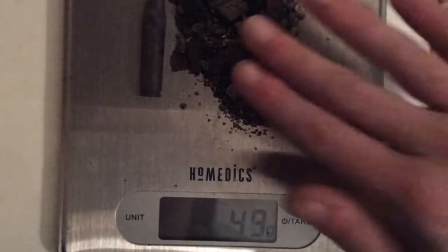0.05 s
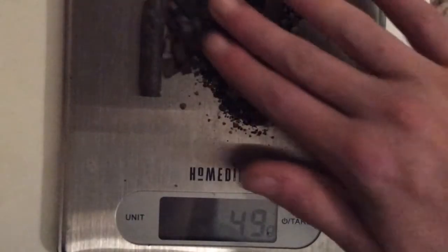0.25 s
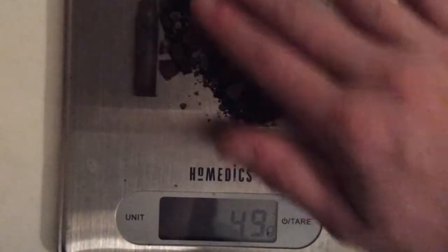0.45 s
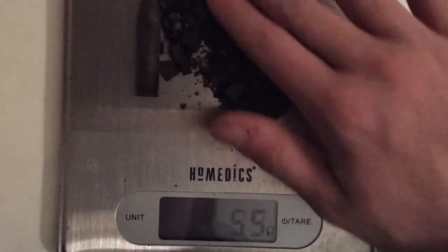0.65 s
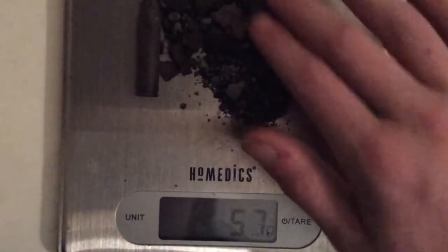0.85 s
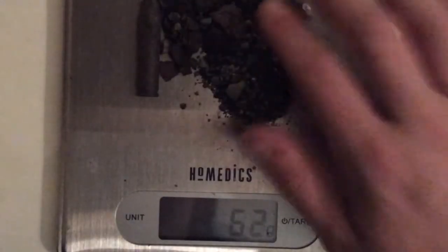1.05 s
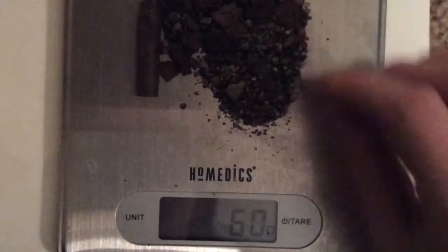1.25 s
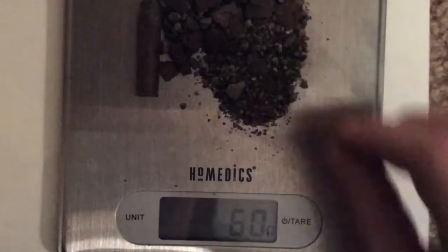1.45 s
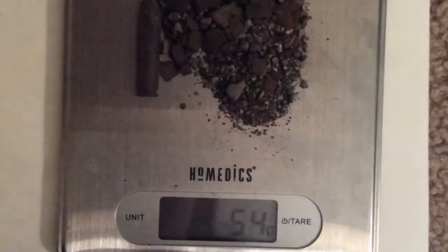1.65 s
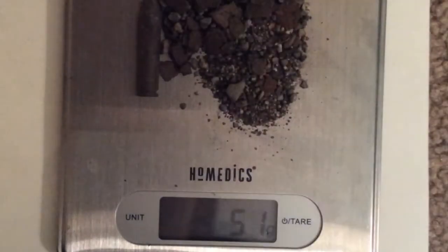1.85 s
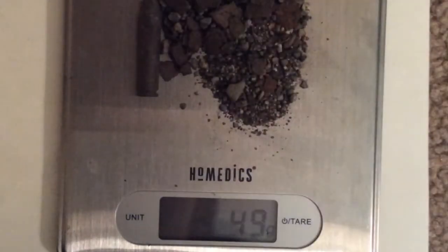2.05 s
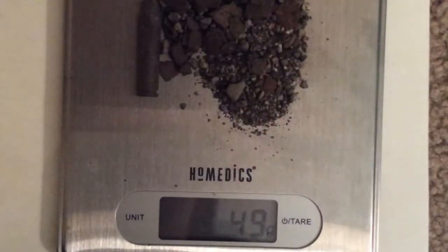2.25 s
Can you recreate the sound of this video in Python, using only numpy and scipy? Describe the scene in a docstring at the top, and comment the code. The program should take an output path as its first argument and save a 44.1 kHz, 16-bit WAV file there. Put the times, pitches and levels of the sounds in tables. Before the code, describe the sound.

Close up in a quiet room, a hand pushes coarse grit over a metal scale pan: two firm, crunchy scrapes, then a lighter skim. Loose chips tick against the steel, and then only faint room hiss remains.

```python
"""A quiet room, one microphone close to a kitchen scale. Fingers sweep a heap of grit three times across
its steel pan: two strokes press down, the third only skims. Coarse chips knock while fine grit crackles
over them; single chips snap free during the strokes and tumble back after them. The pan rings briefly
under its load, and the hand bumps softly against the scale. Behind it all lie low rumble and hiss."""
import sys
import numpy as np
from scipy import signal
from scipy.fft import rfft, irfft
from scipy.io import wavfile

SR = 44100
rng = np.random.default_rng(int(sys.argv[2]) if len(sys.argv) > 2 else 0)


def to_wav(sig):
    """Store sig (one row per channel, or 1-D mono) as 16-bit WAV at the path in sys.argv[1].

    Samples outside -1..1 are clipped; the rate is SR.
    """
    pcm = np.clip(np.atleast_2d(sig), -1, 1) * 32767
    pcm = np.round(pcm).astype(np.int16)
    wavfile.write(sys.argv[1], SR, pcm.T)  # frames by channels


N = 105840

# The swell of the three strokes, one list each.
# Each row: time in seconds, relative level of the coarse chips in dB, that of the fine grit in dB.
STROKE_SWELLS = [
    [(.218, -68, -86), (.222, -47, -64), (.231, -43, -47.5), (.252, -38, -48.5), (.298, -31.5, -34.5),
     (.33, -32, -33.5), (.37, -32.5, -36), (.39, -35.5, -40.5), (.416, -53.5, -56), (.424, -55, -67),
     (.436, -51, -60), (.466, -82, -77)],
    [(.617, -63, -72), (.621, -37, -50), (.634, -37.5, -38), (.666, -41, -46), (.694, -32.5, -37),
     (.722, -32.5, -41), (.738, -35.5, -38.5), (.749, -33, -42), (.762, -47.5, -54.5), (.784, -53, -61),
     (.81, -84, -70)],
    [(.941, -80, -74), (.944, -50, -53), (.965, -48, -53.5), (.991, -48.5, -52), (1.02, -44.5, -44.5),
     (1.038, -50, -52), (1.067, -64, -73), (1.08, -75, -76)],
]
# The colour of each stroke at the microphone. Each row: frequency in Hz, gain in dB.
FIRST_PRESS_EQ = [(88, -62), (150, -40), (204, -29), (416, -19.5), (459, -11), (545, -13.5), (900, -7),
                  (1200, 3), (1510, -10), (1950, -0.5), (2270, -8.5), (3090, -12), (3670, -20), (5300, -14),
                  (7940, -21), (10400, -19), (15000, -36.5)]
SECOND_PRESS_EQ = [(150, -40), (337, -21), (468, -11.5), (600, -13.5), (800, -9), (1130, 1), (1510, -12.5),
                   (1900, -6), (2810, -14.5), (3090, -10), (3670, -22), (5000, -14.5), (6060, -13.5),
                   (7210, -19.5), (9630, -19), (15000, -37.5)]
SKIM_EQ = [(150, -22), (280, -29), (430, -4), (510, -17), (610, 3.5), (800, -12.5), (1160, -4),
           (1650, -7.5), (2100, 4), (3100, -9.5), (3600, -17.5), (4460, -8), (6500, -9.5), (8750, -14.5),
           (10200, -12), (15000, -27)]
# Single chips that snap or tumble; smaller ones click higher. Each row: start in seconds, relative
# knock level in dB, relative click level in dB, lower edge of the click in Hz, decay time in seconds.
CHIP_HITS = [(0.2276, -55, -47, 4500, .002), (.2605, -30, -45, 3600, 0.0014),
             (0.2996, -27.5, -44, 3600, 0.0029), (.305, -30, -33.5, 7000, 0.0022),
             (0.3123, -28.5, -34, 3600, 0.0019), (0.3267, -27.5, -32.5, 4500, 0.0029),
             (.332, -27.5, -32.5, 3600, 0.0018), (0.3758, -29.5, -38, 3600, .0015),
             (0.426, -42, -45.5, 4000, 0.0027), (0.485, -57, -76, 3600, 0.0048),
             (0.4916, -54.5, -68, 3600, .003), (0.503, -70, -55.5, 4500, .002),
             (.5388, -67, -55.5, 3000, 0.0016), (0.555, -71, -62, 3600, .0015),
             (0.606, -57, -74, 3600, 0.0016), (0.63, -33, -36, 5000, 0.0042),
             (0.6347, -32.5, -44, 5000, 0.0014), (.642, -39, -34.5, 7000, 0.0038),
             (0.65, -32.5, -53, 3600, 0.0022), (0.6949, -27.5, -39, 3600, 0.0019),
             (0.7155, -32, -34, 3600, 0.0059), (.730, -32.5, -44, 3600, 0.0012),
             (0.7474, -28, -51, 3600, 0.0024), (0.7911, -60, -42.5, 5500, 0.0024),
             (0.9525, -43, -50.5, 10000, .003), (0.962, -38.5, -58, 7000, 0.0027),
             (0.9692, -40, -39.5, 4500, 0.0013), (1.009, -35.5, -38, 4000, 0.0013),
             (1.020, -43, -32, 3600, 0.002), (1.025, -39, -35.5, 3600, 0.0022),
             (1.0887, -57.5, -48, 6500, 0.003), (1.117, -48, -47.5, 4000, 0.00095),
             (1.126, -63, -56, 4500, .002)]
# The ring of the steel pan. Each row: frequency in Hz, relative gain in dB, seconds to fall by 60 dB.
STEEL_MODES = [(645, -5, 0.11), (930, -9.5, .07), (1166, -8, 0.061), (1336, -6, 0.064), (1823, -3, 0.064),
               (2012, -1, 0.108), (3020, -4.5, 0.097), (3150, -2, 0.09), (4020, 3, 0.1), (4470, -12, 0.066),
               (5240, -3, 0.047), (5400, -1, 0.056), (6300, 7.5, 0.0473), (7640, -2.5, 0.081),
               (8300, 5, .07)]
# Room tone and hiss. Each row: frequency in Hz, relative level in dB.
ROOM_TONE_EQ = [(15, -36), (25, -21.5), (48, -5), (77, 1), (167, -3), (196, -7.5), (231, -5.5), (354, -9.5),
                (621, -14), (1030, -19), (2780, -23.5), (3730, -21.5), (7280, -23.5), (9270, -19),
                (15000, -33.5)]

COARSE_PER_S, COARSE_SPREAD_DB, COARSE_DECAY_S, COARSE_DB = 2000, 4, 0.00095, -3
FINE_PER_S, FINE_SPREAD_DB, FINE_DECAY_S, FINE_DB = 3600, 3, 0.00074, -2
SPLIT_HZ = 3400  # coarse chips sound below this, fine grit above
PAN_DB = -4.5
SETTLE_PER_S, SETTLE_DB = 12, -82
ROOM_T60_S, ROOM_DB, ROOM_DULL_HZ = 0.16, -22.5, 3500
ROOM_TONE_DB, RUMBLE_WAVER_DB = -66.5, 1.5
TOP_HZ = 15300

# The hand bumping and rubbing against the scale.
# Each row: start in seconds, level in dB, band centre in Hz, decay time in seconds.
HAND_CONTACTS = [(.05, -61.5, 89, 0.018), (.425, -56, 583, 0.011), (0.479, -63.5, 500, 0.01),
                 (.53, -61.5, 75, 0.017), (1.749, -66, 229, 0.017), (1.835, -74, 1710, 0.02)]


def stroke(swell, colour):
    """One sweep of the fingers, close up: coarse chips rattle, fine grit crackles."""
    times, coarse_db, fine_db = np.array(swell).T
    t = np.arange(N) / SR
    envelope = lambda db: undb(np.interp(t, times, db, left=-np.inf, right=-np.inf))
    coarse = grains(COARSE_PER_S, COARSE_SPREAD_DB, COARSE_DECAY_S)
    coarse = unit(cut(tint(coarse, colour), SPLIT_HZ, "low"))
    fine = grains(FINE_PER_S, FINE_SPREAD_DB, FINE_DECAY_S)
    fine = unit(cut(tint(fine, colour), SPLIT_HZ, "high"))
    return coarse * envelope(coarse_db + COARSE_DB) + fine * envelope(fine_db + FINE_DB)


def grains(per_s, spread_db, decay_s, stones=24):
    """Collisions at random moments and of uneven size, shared among differently ringing stones."""
    collides = rng.random(N) < per_s / SR
    hits = collides * undb(spread_db * np.minimum(rng.standard_normal(N), 2))
    struck = rng.integers(0, stones, N)
    return sum(through(hits * (struck == k), stone_ring(decay_s)) for k in range(stones))


def stone_ring(decay_s, size=2048):
    """The short irregular ring of one stone, with unit energy."""
    ring = rng.standard_normal(size) * np.exp(-np.arange(size) / SR / decay_s)
    return ring / np.linalg.norm(ring)


def chips():
    """Each chip gives a knock and a click, coloured like the stroke that loosened it."""
    second_s, skim_s = STROKE_SWELLS[1][0][0], STROKE_SWELLS[2][0][0]
    out = np.zeros(N)
    for at, knock_db, click_db, click_hz, decay_s in CHIP_HITS:
        colour = FIRST_PRESS_EQ if at < second_s else SECOND_PRESS_EQ if at < skim_s else SKIM_EQ
        ring = tint(stone_ring(decay_s), colour)
        knock = undb(knock_db) * unit(cut(ring, SPLIT_HZ, "low"))
        click = undb(click_db) * unit(cut(ring, click_hz, "high"))
        onset_gain = np.sqrt(decay_s * SR / 2 / len(ring))  # refers the levels to the start of the hit
        start = int(at * SR)
        out[start:start + len(ring)] += (knock + click) * onset_gain
    return out


def pan(grit):
    """The steel pan's damped modes, driven by the grit."""
    t = np.arange(SR // 4) / SR
    response = 0
    for hz, db, t60 in STEEL_MODES:
        damping = np.log(1000) / t60
        mode = np.exp(-damping * t) * np.cos(2 * np.pi * hz * t)
        response += undb(db) * 2 * damping / SR * mode
    return undb(PAN_DB) * through(grit, response)


def hand_bumps():
    """Soft contacts of skin on the scale that swell and die away, each an octave of noise."""
    t = np.arange(N) / SR
    out = np.zeros(N)
    for at, db, hz, decay_s in HAND_CONTACTS:
        age = np.maximum(t - at, 0) / decay_s
        dull_noise = cut(rng.standard_normal(N), hz * np.sqrt(2), "low")
        body = unit(cut(dull_noise, hz / np.sqrt(2), "high"))
        out += undb(db) * body * age * np.exp(1 - age)
    return out


def settling():
    """Faint ticks of stray grains creeping in the heap."""
    ticks = grains(SETTLE_PER_S, spread_db=4, decay_s=FINE_DECAY_S, stones=4)
    return undb(SETTLE_DB) * unit(cut(tint(ticks, FIRST_PRESS_EQ), 3500, "high"))


def room_tail(near):
    """The furnished room returns a short, dull tail, reaching the microphone 6 ms late."""
    t = np.arange(SR // 2) / SR
    reflections = cut(rng.standard_normal(len(t)), ROOM_DULL_HZ, "low", order=1)
    tail = reflections * undb(-60 * t / ROOM_T60_S) * (t > .006)
    return undb(ROOM_DB) * through(near, tail / np.linalg.norm(tail))


def room_tone():
    """Low room rumble that wavers a little, under even hiss."""
    noise = undb(ROOM_TONE_DB) * unit(tint(rng.standard_normal(N), ROOM_TONE_EQ))
    rumble = cut(noise, 400, "low", order=1)
    drift = unit(cut(rng.standard_normal(N), 13.5, "low", order=2))
    return noise + (undb(RUMBLE_WAVER_DB * drift) - 1) * rumble


def undb(db):
    """Decibels to amplitude."""
    return 10 ** (np.asarray(db) / 20)


def unit(x):
    """Scale to rms 1."""
    return x / np.sqrt(np.mean(x ** 2) + 1e-18)


def through(x, response):
    """Pass a sound through an impulse response."""
    return signal.fftconvolve(x, response)[:len(x)]


def cut(x, hz, kind, order=4):
    """Low-pass or high-pass."""
    return signal.sosfilt(signal.butter(order, hz, kind, fs=SR, output="sos"), x)


def tint(x, points, size=4096):
    """Causal filter that follows (Hz, dB) points."""
    hz, db = np.array(points).T
    bin_hz = np.arange(size // 2 + 1) * SR / size
    gain = undb(np.interp(np.log(bin_hz + 1), np.log(hz), db))
    cepstrum = irfft(np.log(gain))
    cepstrum[1:size // 2] *= 2  # minimum phase: nothing rings ahead of a hit
    cepstrum[size // 2 + 1:] = 0
    return through(x, irfft(np.exp(rfft(cepstrum))))


def scene():
    """Grit, pan and hand close to the microphone, the room behind them, in mono."""
    colours = (FIRST_PRESS_EQ, SECOND_PRESS_EQ, SKIM_EQ)
    sweeps = sum(stroke(swell, colour) for swell, colour in zip(STROKE_SWELLS, colours))
    grit = sweeps + chips() + settling()
    near = grit + pan(grit) + hand_bumps()
    return (near + room_tail(near) + room_tone())[None]


def record(dry):
    """The recorder cuts the top treble steeply."""
    return signal.sosfilt(signal.ellip(10, .2, 70, TOP_HZ, fs=SR, output="sos"), dry)


dry = scene()
out = record(dry)
to_wav(out)
```